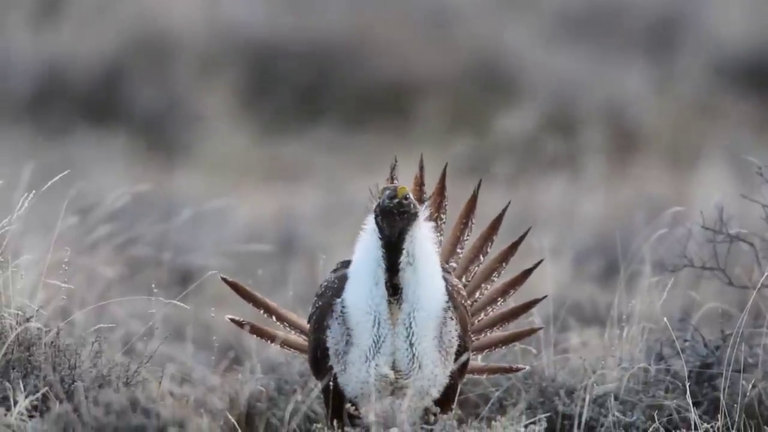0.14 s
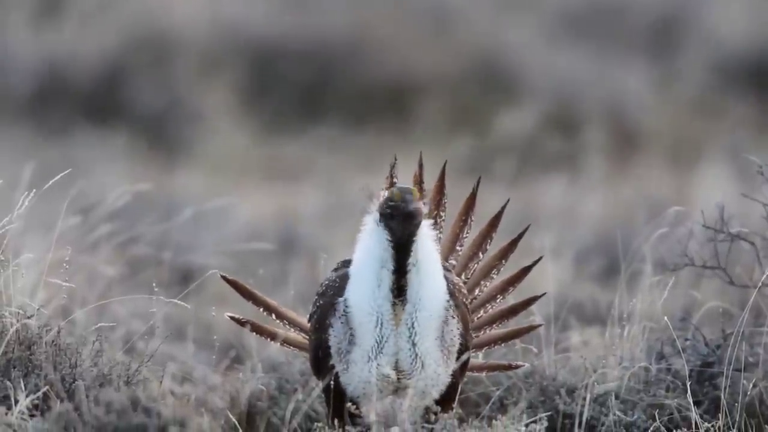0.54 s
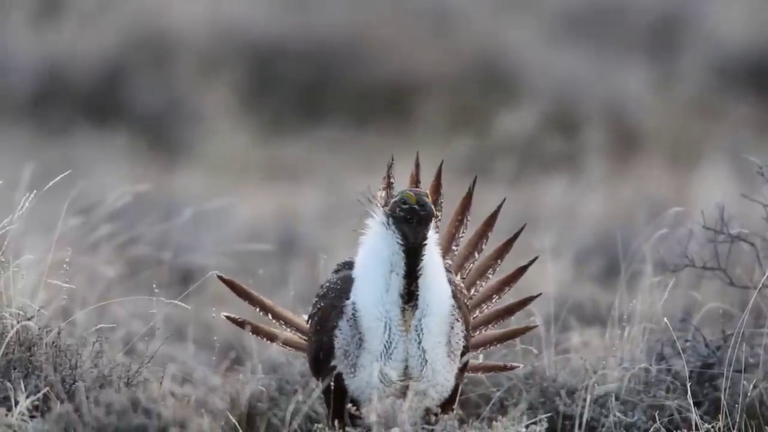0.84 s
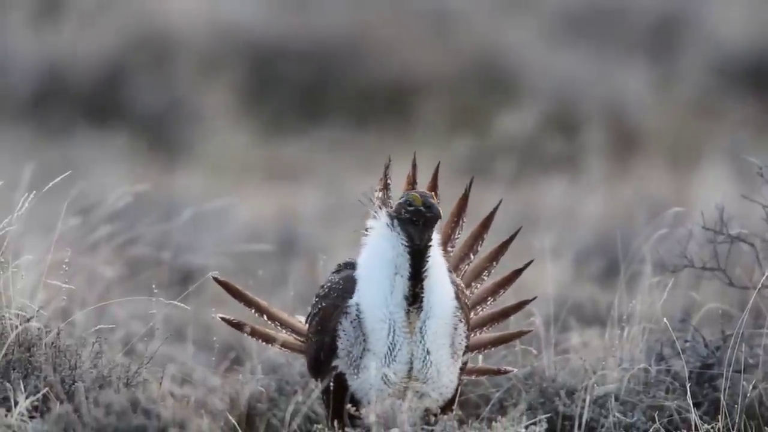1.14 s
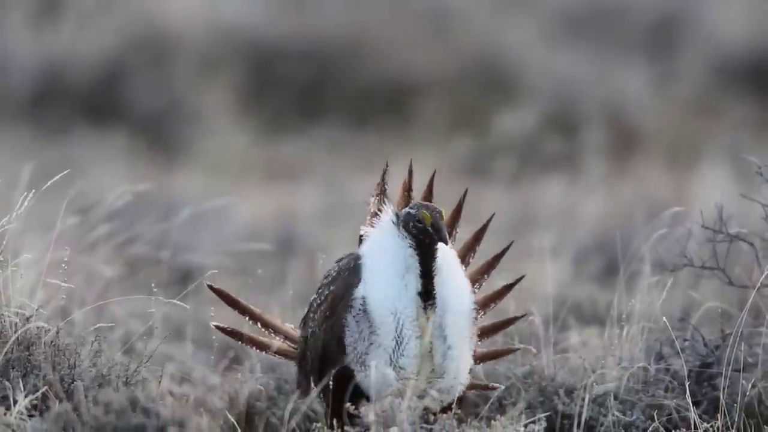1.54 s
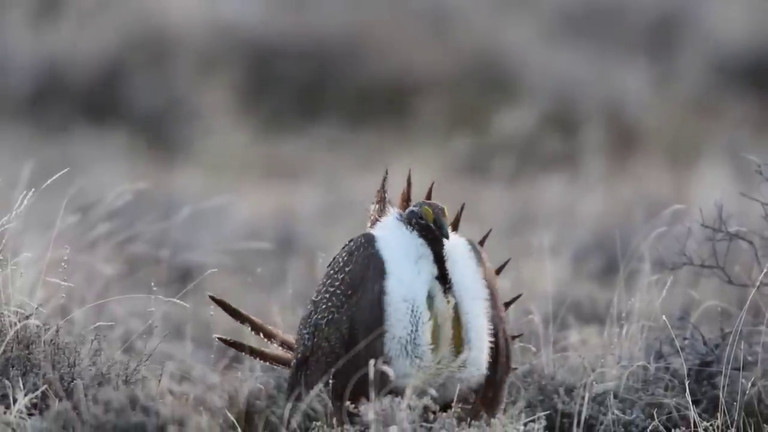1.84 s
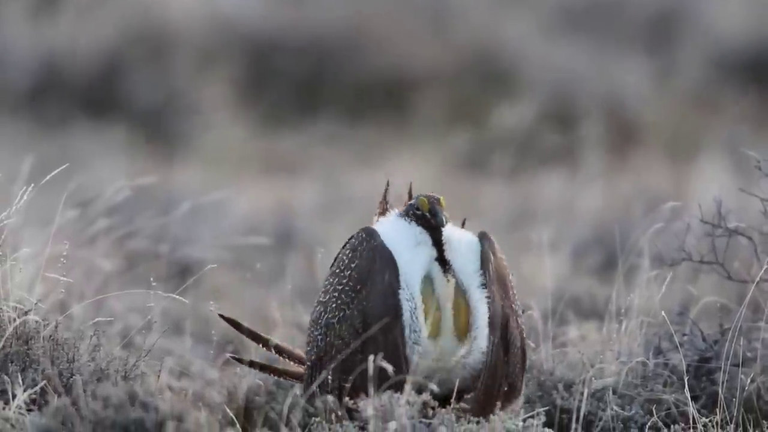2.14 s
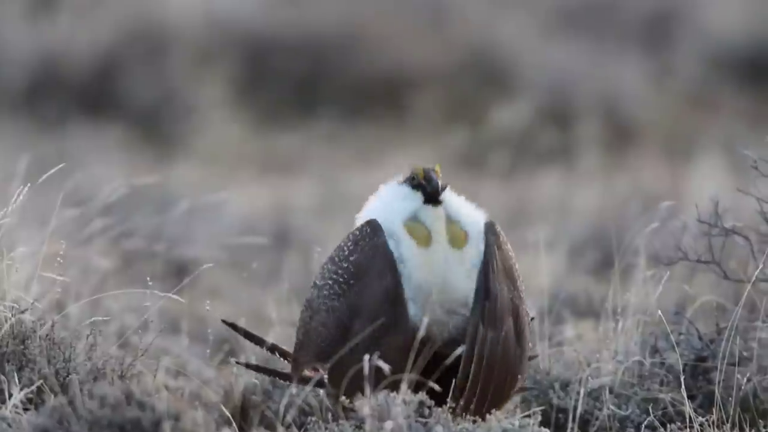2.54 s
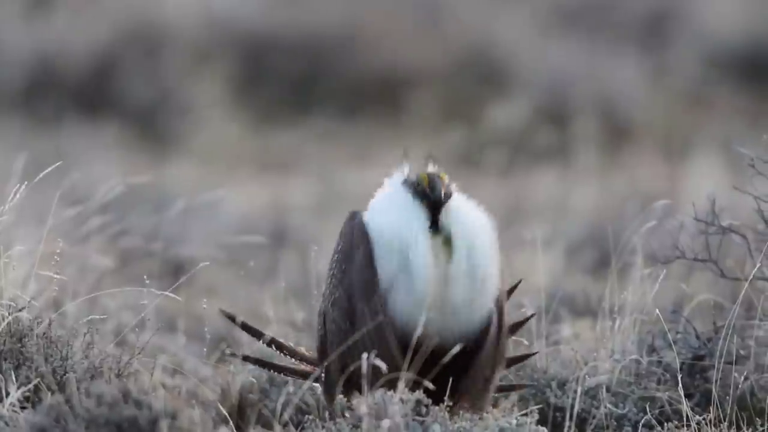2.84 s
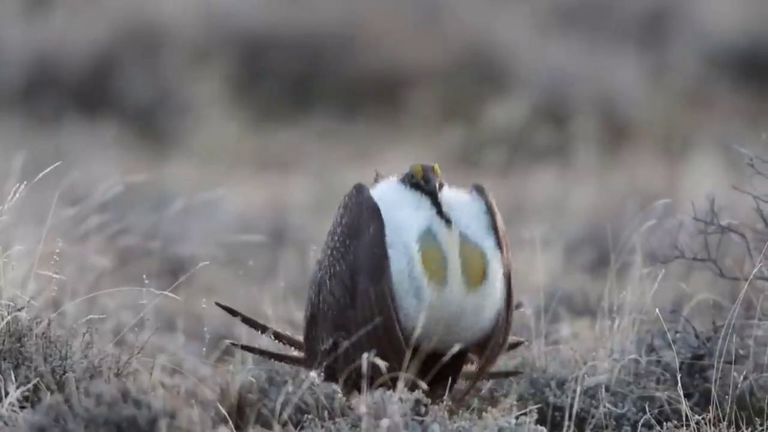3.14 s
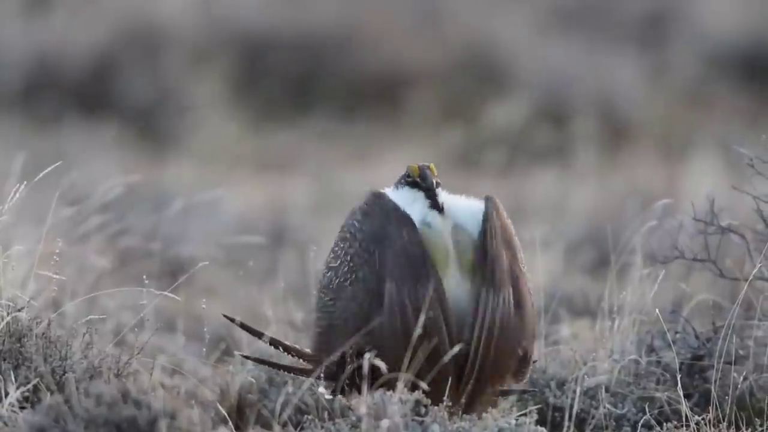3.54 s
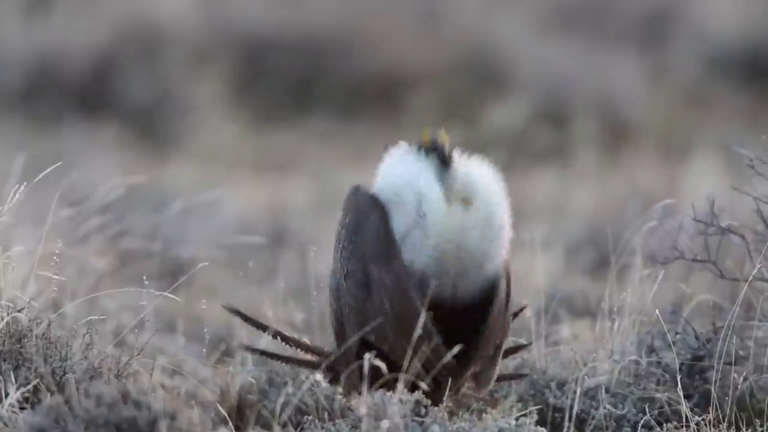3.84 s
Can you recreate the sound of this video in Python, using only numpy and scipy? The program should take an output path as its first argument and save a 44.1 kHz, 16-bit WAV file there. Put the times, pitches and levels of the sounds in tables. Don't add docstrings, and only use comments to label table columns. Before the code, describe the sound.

Grouse air sacs pop at once, with a short whistle between pops. After a quiet gap come a distant warble, low knocks, dry clicks and feather swishes, strongest near the end; outdoors, hissy microphone, soft wind.

```python
import sys
import numpy as np
from scipy import signal
from scipy.io import wavfile
from scipy.ndimage import uniform_filter1d

SR = 44100
rng = np.random.default_rng(int(sys.argv[2]) if len(sys.argv) > 2 else 0)


def undo_db(level):
    steps = np.asarray(level, float) / 20
    return 10 ** steps


def log_audio(samples):
    frames = np.atleast_2d(samples).T
    limited = np.clip(frames, -1, 1)
    pcm = np.round(limited * 32767).astype(np.int16)
    wavfile.write(sys.argv[1], SR, pcm)


N = 176400
T = np.arange(N) / SR


def rms_one(x):
    return x / np.sqrt(np.mean(x ** 2) + 1e-20)


def drift(rate_hz):
    r = np.exp(-80 * np.pi * rate_hz / SR)
    steps = rng.standard_normal(N // 40 + 2002)
    slow = signal.lfilter([1], [1, -2 * r, r * r], steps)[2000:]
    return np.interp(np.arange(N) / 40, np.arange(len(slow)), rms_one(slow))


def follow(table):
    return undo_db(np.interp(T, *np.transpose(table)))


def resonance(x, hz, width_hz):
    r = np.exp(-np.pi * width_hz / SR)
    top = np.array([1, 0, -1]) * (1 - r * r) / 2
    return signal.lfilter(top, [1, -2 * r * np.cos(2 * np.pi * hz / SR), r * r], x)


def resonance_twice(x, hz, width_hz):
    return resonance(resonance(x, hz, width_hz), hz, width_hz)


def banded(spectrum, patchy_db, rate_hz, channels=1):
    hz, db = np.transpose(spectrum)
    edges = 14 * 2 ** np.arange(0, 10.6, .5)
    white = rng.standard_normal((2, channels, N + SR))
    out = 0
    for k, (low, high) in enumerate(zip(edges, edges[1:])):
        centre = np.sqrt(low * high)
        if hz[0] / 1.2 < centre < hz[-1] * 1.2:
            sos = signal.butter(2, [low, high], "band", fs=SR, output="sos")
            band = signal.sosfilt(sos, white[k % 2])[:, SR:]
            level_db = np.interp(np.log(centre), np.log(hz), db)
            out = out + band * undo_db(level_db + patchy_db * drift(rate_hz))
    return rms_one(out)


def glide(rows, flutter_db):
    s, hz, db = np.transpose(rows)
    a, b = int((s[0] - .01) * SR), int((s[-1] + .01) * SR)
    t, out = T[a:b], np.zeros(N)
    pitch_hz = uniform_filter1d(np.interp(t, s, hz), size=110)
    edge_s = .0012
    gate = np.clip(np.minimum(t - s[0], s[-1] - t) / edge_s + 1, 0, 1)
    level = np.sqrt(2) * gate * undo_db(np.interp(t, s, db) + flutter_db[a:b])
    out[a:b] = level * np.sin(2 * np.pi * np.cumsum(pitch_hz) / SR)
    return out


def clear_tones(tables):
    flutter_db = 1.2 * drift(170)
    return sum(glide(rows, flutter_db) for rows in tables)


def swell(s, hz, db, rise_s, t60_s, sag, choke):
    out, a = np.zeros(N), int(s * SR)
    t = T[:min(N - a, int(1.5 * t60_s * SR))]
    shape = (1 - np.exp(-t / rise_s)) ** 2 * undo_db(-60 * (t / t60_s) ** choke)
    tone = np.sin(2 * np.pi * hz * t * (1 - sag * t / t60_s))
    out[a:a + len(t)] = -undo_db(db) * shape / shape.max() * tone
    return out


def jolt(s, db, hz, length_s):
    out, a = np.zeros(N), int(s * SR)
    t = T[:int(length_s * SR)]
    hump = np.sin(np.pi * (t / length_s) ** 1.35) ** 2
    out[a:a + len(t)] = undo_db(db) * hump * np.sin(2 * np.pi * hz * t)
    return out


# pitch_hz [Hz], width_hz [Hz], level_db [dB]
FAR_HUM = [(121.8, 7.2, -65.5), (183.3, 6.9, -68.5), (292, 3, -66)]


def far_drone():
    out = 0
    for hz, width_hz, db in FAR_HUM:
        noise = rng.standard_normal(N + SR)
        out = out + undo_db(db) * rms_one(resonance_twice(noise, hz, width_hz)[SR:])
    return out


# pitch_hz [Hz], level_db [dB per Hz]
FAR_COLOUR = [(70, -3.5), (190, 0.5), (300, -2), (450, -10.5), (1000, -21), (3000, -25), (6000, -34.5)]
# time_s [s], change_db [dB]
FAR_BUSY = [(0, 7.5), (.4, -0.5), (.8, 2), (1.2, 1.5), (1.35, -1.5), (1.6, -2.5), (1.82, 3.5), (1.9, 2),
            (2.2, 6), (2.6, 2.5), (3, 2.5), (3.4, 0.5), (3.65, 4.5), (3.9, 6.5)]


def far_displays():
    return undo_db(-56.5) * follow(FAR_BUSY) * banded(FAR_COLOUR, patchy_db=4, rate_hz=7.0)[0]


# time_s [s], level_db [dB]
WIND_GUSTS = [(0, -45), (.3, -44), (.55, -45.5), (1.84, -45.5), (1.95, -44), (2.15, -42), (2.24, -39),
              (2.3, -43), (2.55, -43), (2.61, -47), (2.66, -42), (2.74, -45), (3.0, -45), (4, -46)]
# pitch_hz [Hz], level_db [dB per Hz]
WIND_COLOUR = [(16, 5.5), (24, -14), (34, -1), (47, -2), (70, -9.5), (110, -17)]


def wind():
    return follow(WIND_GUSTS) * banded(WIND_COLOUR, patchy_db=1.0, rate_hz=3.5)[0]


# start_s [s], jolt_db [dB], sway_delay_s [s], sway_db [dB]
MOUNT_BUMPS = [(0.1825, -31, 0.0085, -25.5), (1.8765, -21.5, 0.0085, -22.5), (2.0435, -24, 0.0105, -25),
               (2.2555, -25, 0.022, -38), (2.68, -44, 0.002, -35)]
# pitch_hz [Hz], level_db [dB], t60_s [s], extra_delay_s [s]
MOUNT_SWAYS = [(46.2, -6, 0.12, .006), (56, -7, 0.45, .011), (37.7, -4, 0.55, 0)]


def bumps():
    out = 0
    for s, jolt_db, delay_s, sway_db in MOUNT_BUMPS:
        out = out + jolt(s, jolt_db, hz=129.6, length_s=0.012)
        for hz, db, t60_s, late_s in MOUNT_SWAYS:
            out = out + swell(s + delay_s + late_s, hz, sway_db + db, .012, t60_s, sag=0, choke=1)
    return out


# start_s [s], level_db [dB], pitch_hz [Hz]
MOUNT_KNOCKS = [(1.901, -37, 190), (2.258, -33.5, 260), (2.29, -31, 107), (2.338, -36, 99),
                (2.396, -38.5, 130), (2.436, -34.5, 108), (2.492, -45, 151), (2.537, -41, 117),
                (2.577, -38, 129), (2.64, -47, 300), (2.235, -38, 173), (2.771, -41, 400),
                (2.895, -43, 170), (3.145, -46, 149)]


def rocking():
    knocks = sum(jolt(s, db, hz, 2 / hz) for s, db, hz in MOUNT_KNOCKS)
    rock = swell(2.2935, hz=31, db=-30, rise_s=.012, t60_s=.75, sag=0, choke=2.04)
    tilt = swell(2.235, hz=11.24, db=-26.5, rise_s=.012, t60_s=3.7, sag=0, choke=0.38)
    return knocks + rock + tilt


# time_s [s], pitch_hz [Hz], level_db [dB]
SONG_WARBLE = [(1.582, 5600, -54), (1.586, 5300, -52), (1.590, 5550, -57), (1.597, 4880, -50),
               (1.603, 5640, -46), (1.608, 4300, -44), (1.616, 5240, -39.5), (1.622, 3600, -53)]
# time_s [s], pitch_hz [Hz], level_db [dB]
SONG_SLIDE = [(1.633, 5800, -53), (1.643, 5300, -43.5), (1.646, 5100, -37.5), (1.657, 4310, -51),
              (1.660, 3140, -52)]
# time_s [s], pitch_hz [Hz], level_db [dB]
SONG_CHIPS = [
    [(1.707, 5700, -60), (1.712, 5630, -54), (1.716, 5750, -61), (1.721, 5760, -46.5), (1.726, 5750, -68)],
    [(1.734, 5300, -54), (1.738, 4000, -50), (1.743, 3280, -59)],
    [(1.769, 3600, -59), (1.772, 3780, -54), (1.775, 4200, -59)],
    [(1.778, 5700, -58), (1.782, 5800, -54), (1.786, 5900, -62)],
]


def songbird():
    return clear_tones([SONG_WARBLE, SONG_SLIDE, *SONG_CHIPS])


# time_s [s], effort_db [dB]
WING_STROKES = [(2.3, -84), (2.56, -61.5), (2.66, -66.5), (2.755, -54.5), (2.83, -70), (2.99, -55.5),
                (3.06, -68), (3.19, -60.5), (3.3, -65), (3.5, -55), (3.66, -48.5), (3.73, -47.5),
                (3.765, -41.5), (3.785, -44), (3.80, -48.5), (3.835, -50), (3.86, -51.5), (3.88, -66),
                (3.92, -60), (3.95, -56)]
# pitch_hz [Hz], width_hz [Hz], level_db [dB]
FEATHER_COMB = [(2000, 770, -5), (2740, 480, -0.5), (3100, 180, 5), (3400, 590, -4), (4200, 1200, -16)]


def wing_swish():
    barbs_per_s, spread_db = 14000, 1.5
    slips = (rng.random(N) < barbs_per_s / SR) * rng.choice([-1, 1], N)
    slips = slips * undo_db(spread_db * rng.exponential(1, N))
    body = 0
    for k, (hz, width_hz, db) in enumerate(FEATHER_COMB):
        ring = resonance(resonance(slips, hz, 2.0 * width_hz), hz, 1.2 * width_hz)
        body = body + (-1) ** k * undo_db(db + .8 * drift(9.8)) * ring
    effort_db = np.interp(T, *np.transpose(WING_STROKES), left=-120)
    return rms_one(body) * undo_db(effort_db)


# time_s [s], pitch_hz [Hz], level_db [dB]
FIRST_SHAFT = [
    (2.752, 2830, -66),
    (2.76, 3100, -51),
    (2.768, 3980, -59),
    (2.778, 5070, -56),
]
# time_s [s], pitch_hz [Hz], level_db [dB]
SECOND_SHAFT = [(3.778, 1747, -53), (3.798, 2055, -44), (3.806, 2406, -42), (3.817, 3020, -30.5),
                (3.82, 3590, -38), (3.829, 4570, -54), (3.838, 5500, -60), (3.85, 6120, -62)]


def feather_shafts():
    grain = signal.lfilter([1], [1, -1.84, .8464], rng.standard_normal(N))
    rasp = 1 + .45 * rms_one(grain)
    steady_db = np.zeros(N)
    return rasp * (glide(FIRST_SHAFT, steady_db) + glide(SECOND_SHAFT, steady_db))


# start_s [s], peak_db [dB], pitch_hz [Hz], width_hz [Hz]
STEM_TICKS = [(0.0389, -28, 1600, 700), (0.0404, -30, 1700, 900), (.0405, -47, 4000, 1200),
              (.1905, -39, 1400, 1200), (0.203, -40, 1300, 1200), (.2292, -33, 2320, 1500),
              (.2292, -36.5, 1130, 800), (0.2287, -47, 3800, 1500), (.2495, -46, 2500, 1500),
              (.254, -46, 1800, 1000), (2.0508, -43, 1900, 1800), (2.0565, -41, 2800, 1000),
              (2.06, -32.5, 3260, 900), (2.06, -39, 1700, 900), (2.068, -45, 3400, 700),
              (2.0802, -37, 1800, 900), (2.082, -43, 4780, 900), (2.0835, -37, 1910, 900),
              (2.0828, -33, 930, 594), (2.0847, -33.5, 3270, 800), (2.0881, -40, 1400, 900),
              (2.096, -42, 1500, 1200), (2.1255, -38, 1580, 1500), (2.126, -43, 3030, 1200),
              (2.1863, -53, 3280, 800), (2.191, -35, 2600, 990), (2.191, -40, 4200, 1200),
              (2.1938, -35.5, 3220, 900), (2.212, -36.5, 3100, 900)]


def stem_ticks():
    out, click = np.zeros(N), 1. * (T[:400] == 0)
    for s, db, hz, width_hz in STEM_TICKS:
        a, ring = int(s * SR), resonance_twice(click, hz, width_hz)
        out[a:a + len(ring)] += undo_db(db) * ring / np.abs(ring).max()
    return out


# start_s [s], peak_db [dB], pitch_hz [Hz], length_s [s]
SKIN_SNAPS = [(0.0384, -28.5, 1280, 0.0017), (0.0391, -36, 3260, 0.0015), (0.044, -30.5, 1590, 0.0017),
              (.19, -39, 3220, 0.0012), (3.213, -44, 700, 0.0061), (0.68, -44.5, 1470, 0.0058),
              (2.051, -38.5, 850, 0.0078), (2.056, -39.5, 1800, 0.0043), (2.081, -39, 1800, 0.0035),
              (2.085, -42, 3300, 0.004), (2.125, -39, 1320, 0.0076), (2.133, -47, 2000, 0.014),
              (2.193, -45, 1320, 0.0034), (2.194, -42.5, 610, 0.011), (2.78, -44.5, 585, 0.01)]


def snaps():
    out, t = np.zeros(N + SR), T[:2000]
    for s, db, hz, length_s in SKIN_SNAPS:
        crackle = rng.standard_normal(len(t)) + 3 * (t == 0)
        burst = resonance_twice(crackle * np.exp(-t / length_s), hz, .6 * hz)
        a = int(s * SR)
        out[a:a + len(t)] += undo_db(db) * burst / np.abs(burst).max()
    return signal.sosfilt(signal.butter(4, 4800, fs=SR, output="sos"), out[:N])


# start_s [s], pitch_hz [Hz], peak_db [dB], rise_s [s], t60_s [s]
SAC_BOOMS = [(.684, 916, -47.5, 0.0026, 0.018), (2.782, 143.5, -31, 0.0026, 0.2),
             (3.395, 1150, -45, 0.001, 0.013), (3.418, 964, -45.5, 0.0036, 0.022),
             (3.574, 1380, -51, .01, 0.13), (3.795, 578, -43, 0.0043, 0.079),
             (3.81, 148, -32, 0.0062, 0.13), (3.838, 131.3, -33, 0.0033, 0.22),
             (3.972, 344.7, -32, 0.0095, 0.43)]


def booms():
    return sum(swell(*row, sag=0.068, choke=0.98) for row in SAC_BOOMS)


# time_s [s], pitch_hz [Hz], level_db [dB]
GROUSE_WHISTLE = [(.048, 1080, -50), (.062, 1250, -49), (.076, 1475, -48), (.088, 1860, -45),
                  (.099, 2480, -48), (.107, 2720, -46), (.114, 2300, -41), (.121, 1500, -47),
                  (.131, 900, -56)]


def grouse_whistle():
    return clear_tones([GROUSE_WHISTLE])


# start_s [s], pitch_hz [Hz], peak_db [dB], length_s [s]
SAC_POPS = [(0, 330, -31.5, 0.015), (0.0435, 191, -25.5, 0.018), (.255, 208, -42.5, .05),
            (.34, 196, -48, 0.054), (0.2313, 332, -22.5, 0.012), (.243, 285, -37, 0.025),
            (0.251, 820, -40.5, 0.0037), (0.2295, 2130, -35, 0.005), (.235, 2100, -39.5, 0.0094),
            (0.245, 2230, -48, 0.0044), (2.113, 228, -42, 0.067), (2.175, 216, -40, 0.037),
            (2.288, 181, -36, 0.021)]


def pops():
    out = np.zeros(N)
    for s, hz, db, length_s in SAC_POPS:
        a, t = int(s * SR), T[:int(length_s * SR)]
        hump = np.sin(np.pi * (t / length_s) ** 0.48)
        out[a:a + len(t)] -= undo_db(db) * hump * np.sin(2 * np.pi * hz * t)
    return out


def scene():
    distance = far_drone() + far_displays() + songbird()
    microphone = wind() + bumps() + rocking()
    feathers = wing_swish() + feather_shafts()
    grouse = stem_ticks() + snaps() + booms() + grouse_whistle() + pops()
    return np.tile(distance + microphone + feathers + grouse, (2, 1))


def band_limit(x):
    return signal.sosfilt(signal.butter(12, 15690, fs=SR, output="sos"), x)


# pitch_hz [Hz], level_db [dB per Hz]
HISS_COLOUR = [(100, -5), (250, 3), (500, 5), (2000, 0.5), (5000, 0), (13000, -3), (15500, -14)]
# pitch_hz [Hz], level_db [dB rms]
WHINE_LINES = [
    (15553, -87),
    (15615, -84),
    (15675, -79),
]


def record(dry):
    hiss = undo_db(-52) * banded(HISS_COLOUR, patchy_db=0.38, rate_hz=4.8, channels=2)
    hiss = hiss + 0.25 * hiss[::-1] / 2
    hiss = hiss - 0.68 * resonance(hiss, hz=8020, width_hz=2080)
    whine = sum(np.sqrt(2) * undo_db(db) * np.sin(2 * np.pi * hz * T) for hz, db in WHINE_LINES)
    offset = .036 * np.array([[-1], [1]])
    return band_limit(dry + hiss + whine + offset)


dry = scene()
out = record(dry)
log_audio(out)
```